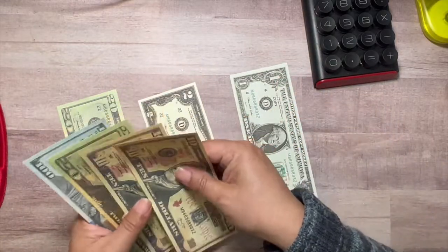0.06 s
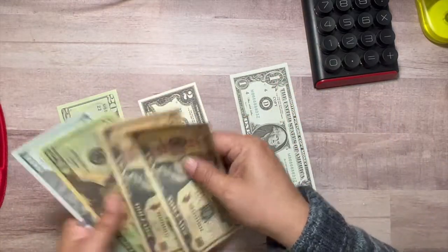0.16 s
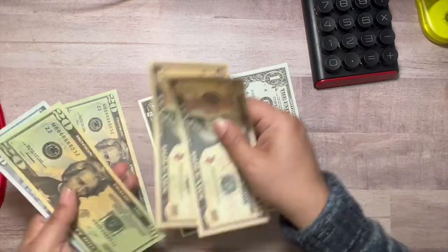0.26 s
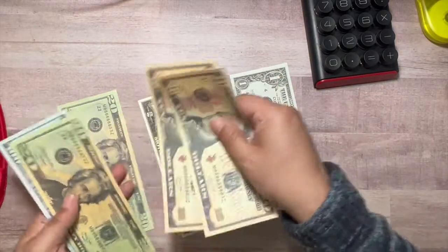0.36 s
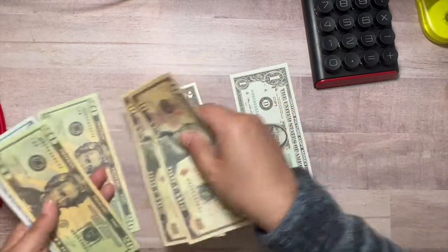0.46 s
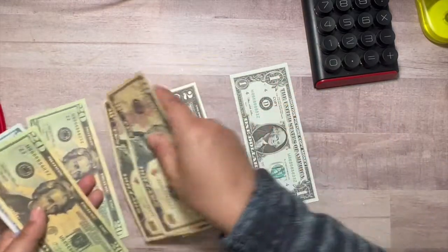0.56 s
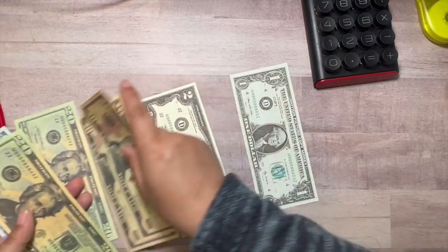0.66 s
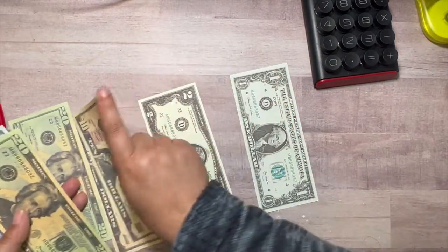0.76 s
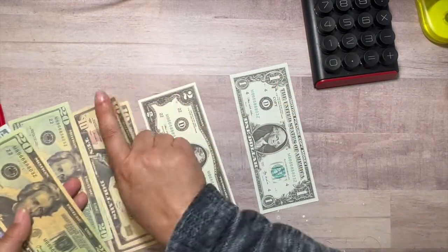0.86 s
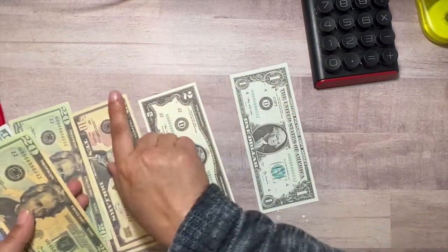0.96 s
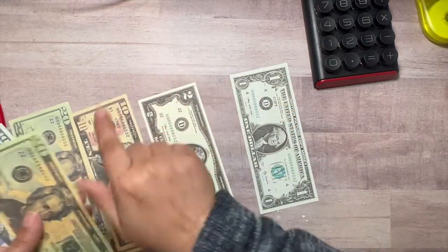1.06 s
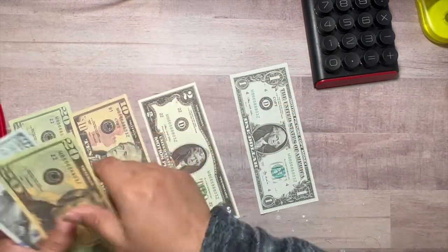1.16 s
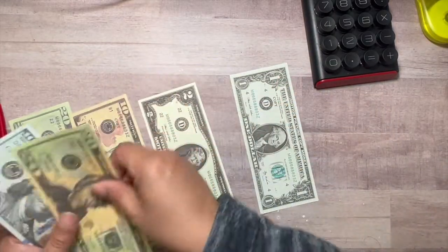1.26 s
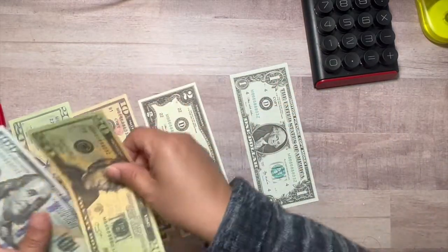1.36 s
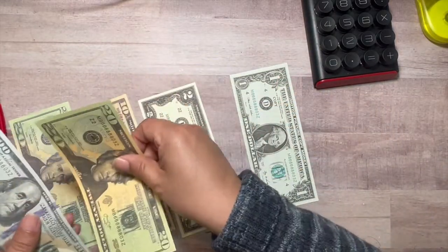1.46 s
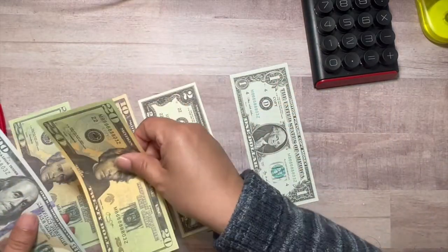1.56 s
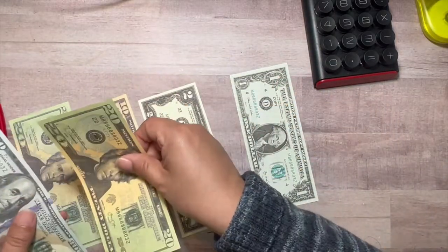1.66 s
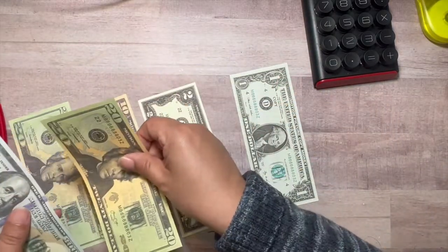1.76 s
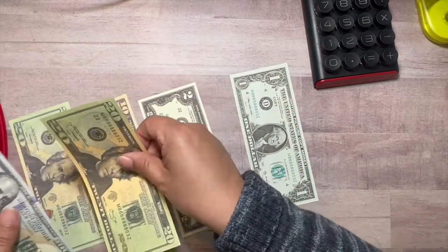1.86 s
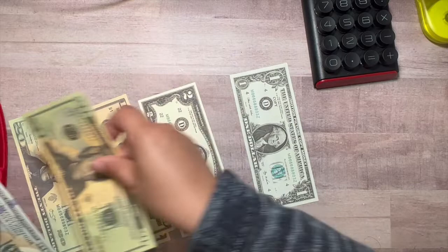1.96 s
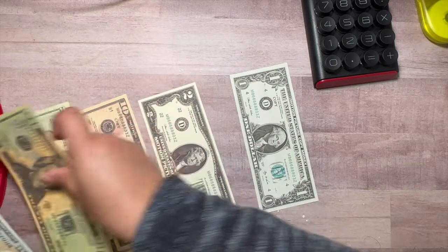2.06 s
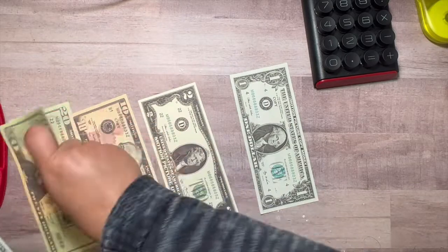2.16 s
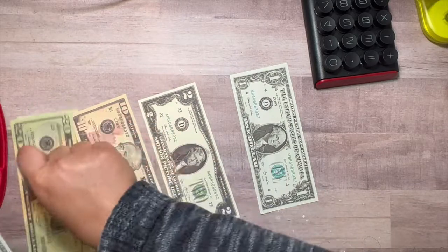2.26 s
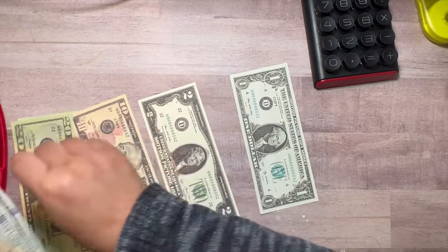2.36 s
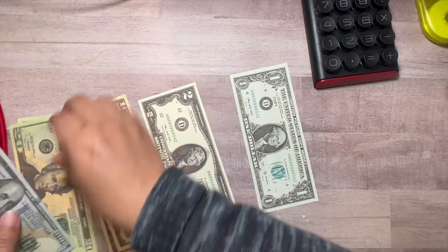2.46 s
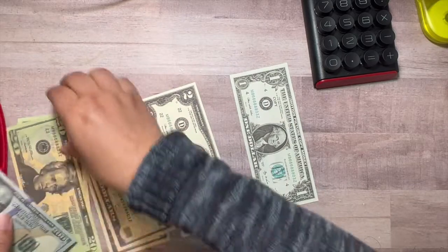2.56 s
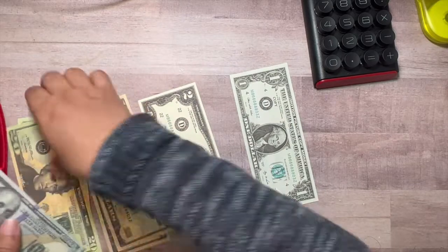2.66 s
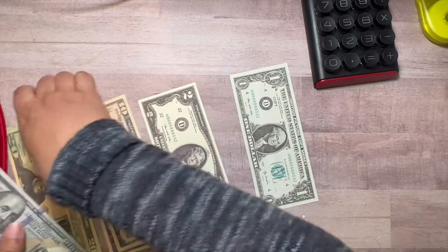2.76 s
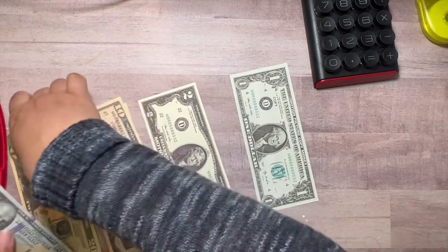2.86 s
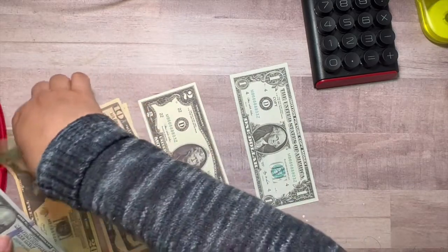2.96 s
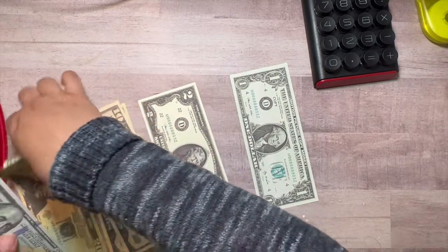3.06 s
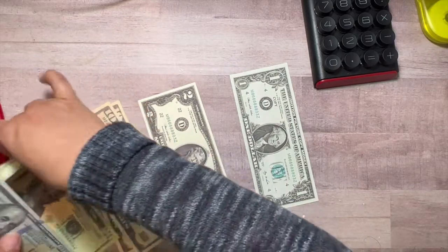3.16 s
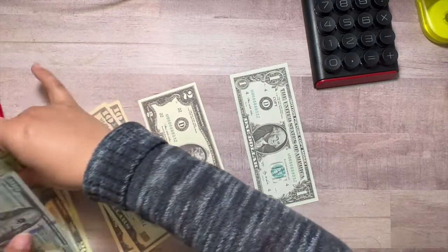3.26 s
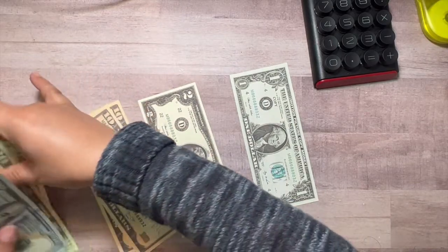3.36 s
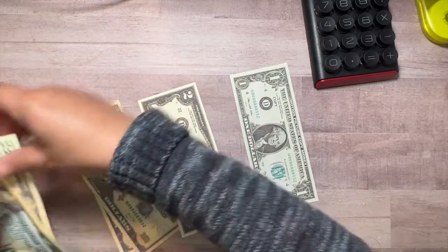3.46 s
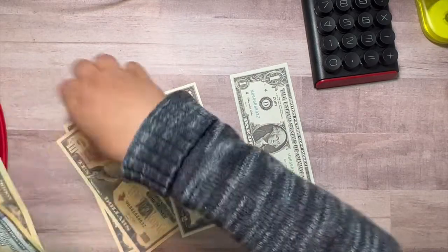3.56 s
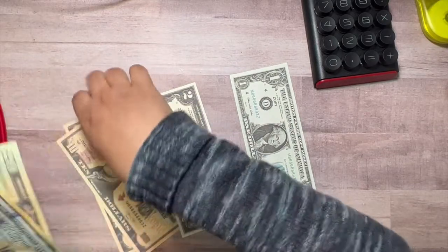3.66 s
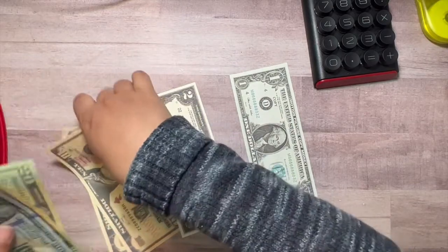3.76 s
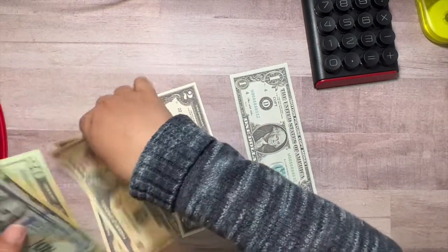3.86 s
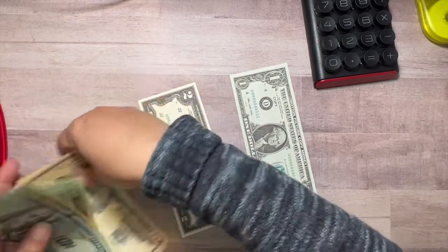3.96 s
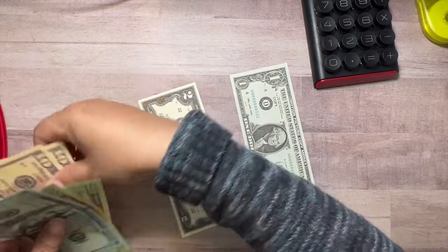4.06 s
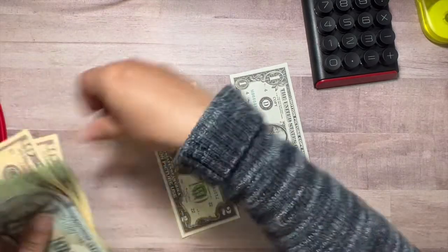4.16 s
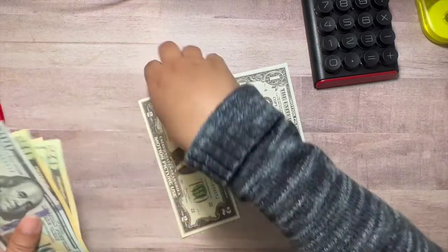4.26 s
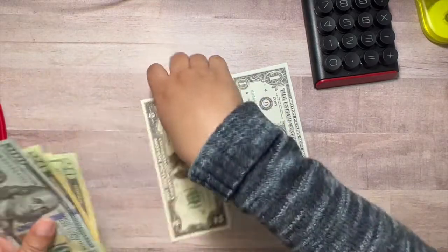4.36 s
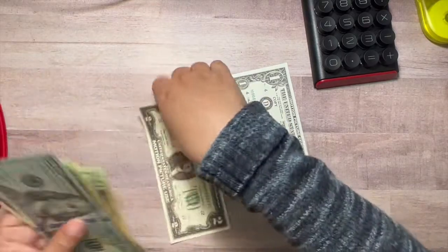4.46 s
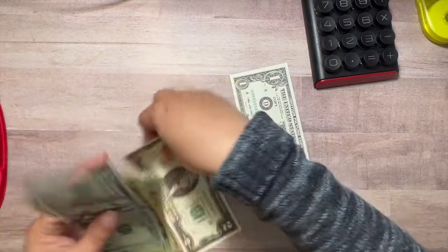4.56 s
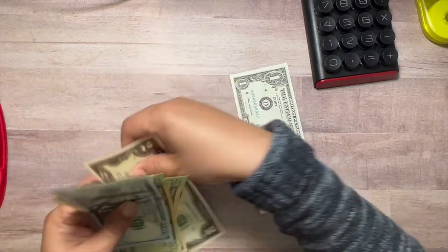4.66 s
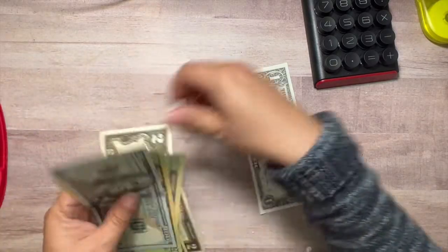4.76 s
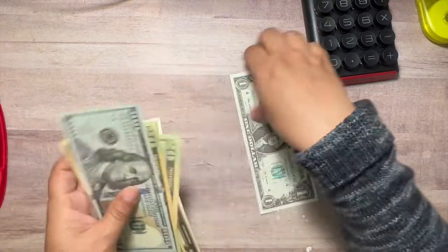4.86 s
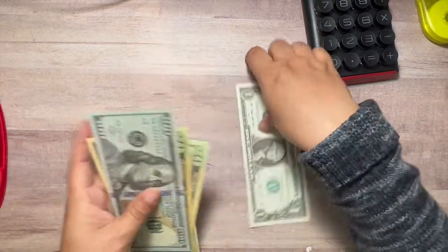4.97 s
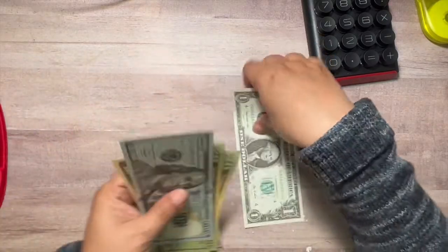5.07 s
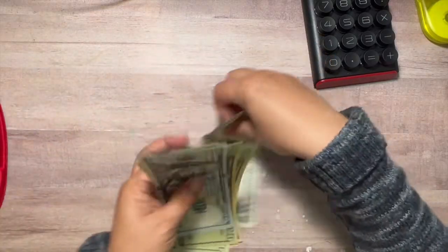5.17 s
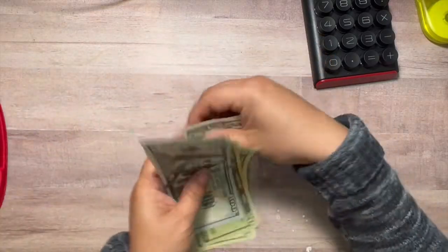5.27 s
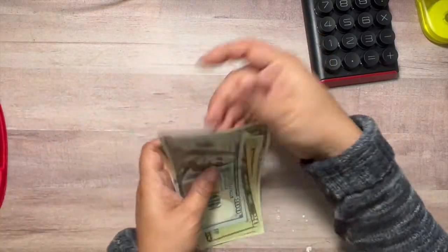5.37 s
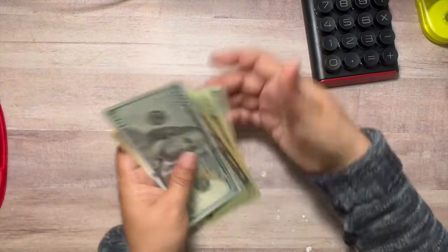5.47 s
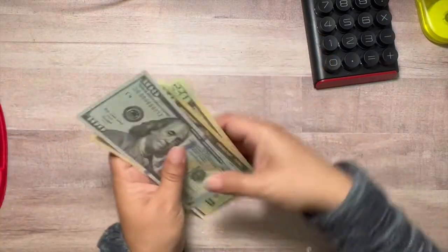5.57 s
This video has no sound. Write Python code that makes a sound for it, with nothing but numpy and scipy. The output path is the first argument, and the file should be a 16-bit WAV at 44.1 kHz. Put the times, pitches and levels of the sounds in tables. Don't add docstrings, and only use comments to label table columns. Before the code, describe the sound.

Close, dry paper handling: short crisp slides with tiny crackles and ticks, a clear crease snap near 1.2 seconds, then a quiet gap. Rustling returns after two seconds and crowds together after 3.5, with the hardest snaps at 4.4 and 5 seconds, then busy patting and gathering. Faint table thuds and wrist-drag hum; small still room, wide stereo.

```python
import sys
import numpy as np
from scipy import signal
from scipy.fft import rfft, irfft
from scipy.io import wavfile
from scipy.ndimage import uniform_filter1d

SR = 44100
rng = np.random.default_rng(int(sys.argv[2]) if len(sys.argv) > 2 else 0)


def undo_db(level):
    steps = np.asarray(level, float) / 20
    return 10 ** steps


def materialize(psi):
    bounded = np.clip(np.atleast_2d(psi).T, -1, 1)
    quanta = np.round(bounded * 32767).astype(np.int16)
    wavfile.write(sys.argv[1], SR, quanta)


N = 247401


def evened(x):
    return x / np.sqrt(np.mean(x ** 2) + 1e-20)


def read(points, hz):
    f, value = np.transpose(points)
    return np.interp(np.log(hz + 1), np.log(f + 1), value)


def add(mix, s, sound):
    part = mix[..., max(round(s * SR), 0):][..., :sound.shape[-1]]
    part += sound[..., :part.shape[-1]]


def band(x, lo_hz, hi_hz):
    sos = signal.butter(2, [lo_hz, min(hi_hz, SR / 2.1)], "bandpass", fs=SR, output="sos")
    return signal.sosfilt(sos, x)


def shaped(x, spectrum):
    return irfft(rfft(x) * undo_db(read(spectrum, np.fft.rfftfreq(N, 1 / SR))), N)


def lean():
    # t/s, rumble level/dB
    weight = [(0.0, -80), (0.23, -59), (0.449, -90), (0.75, -61.5), (0.95, -79), (1.1, -78), (1.22, -67),
              (1.4, -80), (1.81, -88), (2.15, -65), (2.45, -74), (2.86, -62.5), (3.09, -70), (3.35, -61),
              (3.55, -67), (4.05, -63), (4.3, -72), (4.94, -55.5), (5.61, -72)]
    s, db = np.transpose(weight)
    rumble = band(band(rng.standard_normal(N), 42, 156), 42, 156)
    rumble *= undo_db(4.2 * evened(uniform_filter1d(rng.standard_normal(N), size=3000)))
    return evened(rumble) * undo_db(np.interp(np.arange(N) / SR, s, db))


def air():
    # f/Hz, density/dB per Hz
    room_spectrum = [(20, -67), (40, -4.5), (63, -6.5), (120, -14), (700, -33), (1500, -31), (5000, -45),
                     (13000, -54)]
    level_db = -71
    return undo_db(level_db) * evened(shaped(rng.standard_normal((2, N)), room_spectrum))


def crackle():
    out = np.zeros((2, N))
    for hz in np.geomspace(500, 12000, num=10):
        clump = undo_db(5.3 * evened(uniform_filter1d(rng.standard_normal(N), 700)))
        size = undo_db(1.3 * np.minimum(rng.exponential(1, N), 4))
        struck = rng.random(N) < 350 / SR
        folds = clump * size * struck * rng.choice([-1, 1], (2, N))
        out += np.sqrt(hz) * evened(band(folds, hz / 1.4, hz * 1.25))
    return evened(out)


def patchy(x, patchy_db):
    z = signal.stft(x, nperseg=256)[2]
    field = uniform_filter1d(rng.standard_normal(z.shape[1:]), size=2, axis=0)
    field = uniform_filter1d(field, size=9, axis=1)
    return signal.istft(z * undo_db(patchy_db * evened(field)), nperseg=256)[1][:, :N]


def stroke_db(t, start, hold):
    attack_s, release_db_per_s = 0.024, 186
    rise = np.clip((t - start) / attack_s, 1e-5, 1)
    return 20 * np.log10(rise) - release_db_per_s * np.maximum(t - start - attack_s - hold, 0)


def slide():
    # f/Hz, density/dB per Hz
    paper_spectrum = [(150, 12), (300, -1), (800, -8), (1600, 15), (4100, 10), (7300, 17), (10000, 9),
                      (15700, -2)]
    # t/s, level/dB
    fidget = [(0, -59), (.4, -61), (.56, -58), (.96, -68), (1.4, -65), (1.5, -75.5), (1.67, -89.5),
              (1.8, -73.5), (1.92, -61.5), (2.3, -64.5), (2.53, -79), (2.75, -58), (3.02, -61), (3.5, -55),
              (4.29, -60.5), (4.9, -59.5), (5.52, -60.5), (5.61, -60)]
    # start/s, hold/s, rubbing level/dB, flapping body/dB re rubbing
    strokes = [(0.049, 0.1, -47, -4.5), (0.32, 0.052, -53, -6.5), (0.588, 0.093, -45, -13),
               (0.723, 0.056, -53.5, -5.5), (0.987, 0.044, -63.5, -8), (1.043, .11, -55.5, -10),
               (1.171, 0.086, -47, -10), (1.939, 0.15, -57.5, -2.5), (2.11, 0.026, -55.5, -7),
               (2.751, 0.012, -45.5, -3.5), (2.851, 0.051, -48.5, -10.5), (3.043, .11, -56.5, -30),
               (3.156, 0.073, -53.5, -22), (3.26, 0.086, -51.5, -2.5), (3.437, 0.09, -56.5, -1),
               (3.541, 0.016, -47, -5.5), (3.672, .07, -51.5, -7.5), (3.765, 0.12, -45.5, -6),
               (3.994, 0.13, -53.5, -8), (4.164, 0.037, -52.5, -19), (4.302, 0.2, -47.5, -9),
               (4.54, 0.13, -51.5, -4.5), (4.656, 0.027, -44.5, -4), (4.78, 0.027, -51, -6.5),
               (4.924, 0.16, -47, -9.5), (5.147, 0.058, -40.5, -7.5), (5.239, 0.038, -44.5, -3),
               (5.356, 0.076, -53.5, -10), (5.538, .06, -50.5, -2.5)]
    fidget_body_db, fidget_crisp_db = -6, -3
    crisp_db, crisp_per_db, hard_db = -1.5, 0.06, -45

    t = np.arange(0, N + 64, 64) / SR
    rubbing = undo_db(np.interp(t, *np.transpose(fidget))) ** 2
    body = rubbing * undo_db(fidget_body_db) ** 2
    bright = rubbing * undo_db(fidget_crisp_db) ** 2
    for start, hold, level_db, body_db in strokes:
        power = undo_db(level_db + stroke_db(t, start, hold)) ** 2
        rubbing = rubbing + power
        bright = bright + power
        body = body + power * undo_db(body_db) ** 2
    hardness_db = 10 * np.log10(rubbing) - hard_db
    crisp = bright * undo_db(crisp_db + crisp_per_db * hardness_db) ** 2
    rubbing, body, crisp = (np.interp(np.arange(N) / SR, t, np.sqrt(p)) for p in (rubbing, body, crisp))

    grip = undo_db(0.94 * evened(uniform_filter1d(rng.standard_normal(N), 500)))
    hiss = grip * rng.standard_normal((2, N))
    paper = patchy(shaped(hiss + 0.39 * crackle(), paper_spectrum), patchy_db=3)
    layers = rubbing * evened(band(paper, 1550, 6670))
    layers += body * evened(band(paper, 300, 1250))
    return layers + crisp * evened(band(paper, 9000, 18000))


def snaps():
    # t/s, peak/dB, ring f/Hz, crispness/dB re peak, buckling time/ms
    dry_creases = [(0.247, -38.5, 3330, -17, 3.3), (0.3416, -39.5, 1640, 11, 1.5),
                   (0.849, -38.5, 3360, -17.5, 3.4), (1.1129, -37, 1830, -17, 1.7),
                   (1.188, -19.5, 3730, -23, 1.3), (1.5271, -45.5, 6140, -16, 2),
                   (1.825, -45.5, 4470, -25, 1.9), (2.145, -25, 3740, -20.5, 1.96),
                   (2.393, -47, 1570, 0, 1), (2.606, -34, 5500, -11, 0.96), (3.2879, -37.5, 3880, -43, 1.9),
                   (3.671, -28, 5060, -24, 1.15), (3.7569, -13.5, 6650, -16.5, 1.8),
                   (2.9246, -21.5, 2730, -19.5, 1.2), (3.805, -20.5, 5100, -12.5, 1.4),
                   (4.0012, -22, 2950, -31, 0.74), (4.347, -30, 4800, -32, 1.9),
                   (4.357, -24, 4100, -29.5, 2.2), (4.3689, -11.5, 3760, -10.5, 1.4),
                   (4.3726, -7.5, 4890, -22, 3.6), (4.6381, -16.5, 4100, -25, 3.5),
                   (4.742, -29.5, 4570, -22.5, 3.6), (4.941, -32, 1520, 4, 1.4),
                   (4.9597, -6, 7500, -2, 1.2)]
    # t/s, peak/dB, ring f/Hz, crispness/dB re peak, buckling time/ms
    pops = [(0.6003, -39.5, 4480, -4, 1.5), (1.8, -56, 3630, -31, 0.97), (1.9532, -38.5, 4700, -16, 3.6),
            (1.9983, -34, 4700, -28, 2.2), (2.8723, -33, 2850, -24.5, 1.4),
            (3.0644, -43.5, 5630, -32, 0.82), (3.205, -28.5, 1860, -10.5, 2.6),
            (3.338, -36, 4600, -32.5, 1.5), (3.6978, -36.5, 2820, -27, 1.5),
            (2.9009, -26.5, 2380, -31.5, 0.78), (4.0467, -24.5, 1910, -29, 1.3),
            (4.2025, -32.5, 3760, -34, 1.1), (4.2234, -35, 4270, -18, 0.79), (4.32, -39, 8510, -6, 0.64),
            (5.2186, -21, 1820, -41, 1.5), (5.2697, -27.5, 2900, -23.5, 1.4)]
    # t/s, peak/dB, ring f/Hz, crispness/dB re peak
    peels = [(0.0703, -36, 2520, -7), (1.7376, -56, 4700, -35.5), (2.0204, -32, 4370, -13),
             (2.1013, -24.5, 2220, -30.5), (2.756, -25, 2430, -18), (3.3812, -37.5, 3580, -18),
             (3.462, -35.5, 5400, -12), (3.573, -37.5, 4700, -28), (3.9775, -24.5, 2500, -15),
             (4.5982, -28, 5480, -33), (4.8202, -34.5, 4100, -12.5), (4.9073, -36.5, 9200, 13),
             (5.165, -37, 8140, -18), (5.5587, -42.5, 8970, 0)]
    snap_flutter_db, pop_flutter_db, peel_flutter_db, peel_ms = -16.5, -4.5, 1, 1.4

    out, t = np.zeros((2, N)), np.arange(9000) / SR
    pause = 1 - np.exp(-(t / .006) ** 2)
    creases = [(*r, snap_flutter_db) for r in dry_creases]
    creases += [(*r, pop_flutter_db) for r in pops]
    creases += [(*r, peel_ms, peel_flutter_db) for r in peels]
    for s, peak_db, hz, crisp_db, buckle_ms, flutter_db in sorted(creases):
        noise = rng.standard_normal((4, 2, len(t)))
        age = 1000 * t / buckle_ms
        burst = age ** 1.24 * np.exp(1.43 * (1 - age))
        ragged_db = 2.9 * evened(uniform_filter1d(noise[3, 0], 90))
        flutter = undo_db(flutter_db + ragged_db - 60 * t / 0.095) * pause
        wide = band(noise[0], hz / 2.2, 12000)
        wide = evened(band(wide, hz / 2.2, min(hz * 2.5, 9000)))
        ring = evened(band(noise[1], hz / 1.232, hz * 1.158))
        crisp = undo_db(crisp_db + 7) * evened(band(noise[2], 8670, 13600))
        voice = 0.48 * wide + 0.47 * ring + crisp
        peak = abs(voice * burst).max(axis=1)[:, None]
        add(out, s - .0005, voice * (burst + flutter) * undo_db(peak_db) / peak)
    return out


def ticks():
    # t/s, peak/dB, ring f/Hz
    releases = [(0.0738, -37, 2620), (0.0871, -34, 1090), (0.2493, -35.5, 1120), (0.662, -34.5, 1760),
                (1.1308, -36, 1680), (1.1494, -41.5, 1210), (1.1618, -38.5, 1460), (1.1768, -38, 1340),
                (1.1889, -21.5, 5020), (1.529, -51, 6200), (1.7185, -66.5, 1080), (1.7401, -52.0, 4650),
                (1.7475, -53.0, 4650), (1.8002, -54.5, 4520), (1.8266, -44, 1110), (1.9525, -41, 5680),
                (1.9674, -35.5, 4690), (2.1028, -26, 2840), (2.147, -26, 2890), (2.3903, -53, 1160),
                (2.4022, -49, 1170), (2.5656, -61, 600), (2.6055, -41, 5840), (2.6933, -49.5, 910),
                (2.7254, -45, 1000), (2.7569, -22, 2250), (2.7932, -33.5, 3570), (2.7963, -33, 5600),
                (2.8678, -41, 3190), (2.8759, -37.5, 2430), (2.9012, -30.5, 2430), (3.0653, -41.5, 5700),
                (3.2078, -28, 6630), (3.3019, -37.5, 1005), (3.3368, -36.5, 1020), (3.3843, -37, 1070),
                (3.4981, -37, 1174), (3.5035, -39.0, 1120), (3.6709, -25.0, 4430), (3.7578, -17.5, 2870),
                (3.8064, -22.5, 5440), (3.9788, -24.0, 2410), (4.0015, -22, 1410), (4.0171, -31, 1030),
                (4.047, -26, 1350), (4.0832, -34.0, 1290), (4.2029, -36.5, 3000), (4.2621, -41.5, 3770),
                (4.3233, -35.0, 4500), (4.348, -30, 4910), (4.3682, -19.5, 3230), (4.3757, -13.5, 3750),
                (4.6416, -15.0, 4830), (4.9437, -33.0, 1720), (4.9603, -16, 11200), (5.2195, -26, 1690),
                (5.2706, -30.5, 2970), (5.2797, -23.0, 1480),
                (0.16, -40, 1130), (0.177, -40, 810), (0.251, -46, 3000), (0.34, -43, 1170),
                (2.766, -35, 2270), (2.918, -33, 2600), (3.076, -50, 5500), (3.217, -38, 6670),
                (3.282, -38, 2460), (3.29, -33, 4090), (3.308, -41, 4830), (3.344, -41, 2600),
                (3.464, -42, 5140), (3.765, -28, 6780), (3.894, -37, 3570), (3.9855, -31, 1020),
                (4.01, -30, 2800), (4.05, -32, 2000), (4.654, -32, 4770), (5.18, -40, 1290),
                (5.222, -28, 4160), (5.229, -29, 1810), (5.288, -31, 1700), (3.381, -36, 3700),
                (3.394, -42, 2800), (0.181, -42, 4800)]
    rise_cycles, edge_db = .8, -6
    out, t = np.zeros(N), np.arange(600) / SR
    for s, peak_db, hz in releases:
        u = t * hz / rise_cycles
        ring = np.sin(2 * np.pi * hz * t) * u * np.exp(1 - u)
        edge = rng.standard_normal(len(t)) * np.exp(-t / 0.0005)
        add(out, s - .0003, undo_db(peak_db - 1.5) * (ring + undo_db(edge_db) * edge))
    return out


def flaps():
    # t/s, peak/dB, ring f/Hz
    loose = [(0.0863, -35, 950), (0.161, -35, 962), (0.176, -46, 1080), (1.135, -44, 613),
             (1.165, -49, 440), (0.339, -39, 1034), (0.602, -53, 1160), (1.117, -37, 906),
             (1.955, -47, 1010), (2.03, -37.5, 1440), (2.104, -36.5, 1014), (2.142, -40, 395),
             (2.391, -44.5, 917), (2.918, -34.5, 700), (3.335, -36.5, 1100), (3.496, -38, 887),
             (3.982, -31, 1200), (4.016, -33, 1000), (4.046, -30, 1100), (4.203, -47, 397),
             (4.371, -29.5, 1117), (4.494, -43, 527), (4.602, -42, 426), (4.638, -24.5, 1437),
             (4.667, -45, 1460), (4.747, -33, 1320), (4.821, -45, 1250), (5.156, -43, 1360)]
    # t/s, peak/dB, ring f/Hz
    pats = [(0.248, -40, 930), (0.661, -39, 368), (1.188, -30.5, 883), (1.338, -49, 1050),
            (1.528, -57.5, 1000), (1.826, -50, 1044), (2.607, -44.5, 1075), (2.694, -48.5, 1100),
            (2.756, -33, 1064), (2.786, -42.5, 484), (3.209, -43, 455), (3.29, -37, 492),
            (3.384, -38, 1003), (3.461, -45, 440), (3.669, -40.5, 423), (3.757, -36.5, 466),
            (3.807, -39, 540), (4.225, -42, 373), (4.317, -42.5, 350), (4.348, -43, 423), (4.837, -36, 713),
            (4.906, -41.5, 440), (4.943, -36, 1650), (4.96, -28, 1470), (5.09, -44.5, 600),
            (5.179, -38.5, 462), (5.221, -27.5, 560), (5.279, -27.5, 1198), (5.571, -40.5, 430)]
    loose_t60_s, damped_t60_s = 0.14, 0.044
    out, t = np.zeros((2, N)), np.arange(5000) / SR
    for s, peak_db, hz, t60_s in sorted([(*r, loose_t60_s) for r in loose] + [(*r, damped_t60_s) for r in pats]):
        noise = rng.standard_normal((2, len(t)))
        lumps = undo_db(2.5 * evened(uniform_filter1d(noise[1, ::-1], size=130)))
        rattle = evened(lumps * band(noise, hz / 2.4, hz * 1.8))
        falling_hz = hz * (1 + 0.54 * np.exp(-t / 0.00079))
        ring = np.sin(2 * np.pi * np.cumsum(falling_hz) / SR) * undo_db(-60 * t / 0.041)
        pat = ring + 1.09 * rattle * undo_db(-60 * t / t60_s)
        pat = pat * (1 - np.exp(-t / 0.00048))
        add(out, s - .0005, pat * undo_db(peak_db) / abs(pat[0]).max())
    return out


def knocks():
    # t/s, peak/dB
    taps = [(0.173, -54), (0.294, -51), (0.36, -55), (0.664, -52), (0.794, -51), (2.142, -38), (2.398, -58),
            (2.606, -36), (2.693, -33), (2.924, -46.5), (3.346, -52), (3.572, -36.5), (3.635, -33),
            (3.979, -44), (4.225, -32), (4.314, -40.5), (4.366, -40), (4.839, -31), (5.163, -49)]
    # f/Hz, level/dB, t60/s
    modes = [(56.6, -1, 0.092), (120, -5, 0.16), (147, 4, 0.079), (164.3, -6, 0.21), (259.7, -11, 0.11),
             (375, -14.5, 0.17), (1000, -40, 0.017)]
    dimple_hz = 184.6
    out, t = np.zeros(N), np.arange(16000) / SR
    board = sum(undo_db(db - 60 * t / t60_s) * np.sin(2 * np.pi * hz * t) for hz, db, t60_s in modes)
    board = board * (1 - np.exp(-(t / 0.013) ** 2))
    sweep_hz = dimple_hz * (1 + 2.84 * np.exp(-t / 0.00396))
    blow = undo_db(-60 * t / 0.038) * np.sin(2 * np.pi * np.cumsum(sweep_hz) / SR)
    knock = blow * (1 - np.exp(-(t / 0.0052) ** 2)) + 0.44 * board
    for s, peak_db in taps:
        add(out, s - .001, undo_db(peak_db) * knock / abs(knock).max())
    return out


def swishes():
    # t/s, level/dB, f/Hz, length/s
    flicks = [(0.826, -55.5, 2700, 0.048), (1.96, -46.5, 6100, 0.016), (2.018, -39, 4300, 0.03),
              (2.102, -44, 2240, 0.062), (2.33, -60.5, 5500, 0.05), (0.765, -58, 4400, 0.06),
              (3.863, -44.5, 2860, 0.068), (3.94, -37, 13000, .045), (4.382, -40.5, 5400, 0.065),
              (3.94, -44.5, 4500, 0.042), (3.7565, -23.5, 2660, 0.0038), (0.297, -51, 12000, .008),
              (1.27, -51.5, 5700, 0.087), (3.276, -43.5, 3130, 0.028)]
    out = np.zeros((2, N))
    for s, level_db, hz, length_s in flicks:
        noise = rng.standard_normal((2, 4000))[:, :round(length_s * SR)]
        hollow = evened(band(noise, hz / 1.55, hz * 1.41))
        add(out, s, undo_db(level_db) * hollow * signal.windows.tukey(hollow.shape[1], .6))
    return out


def whistles():
    # t/s, level/dB, from f/Hz, to f/Hz, length/s
    gaps = [(.97, -66, 3200, 3700, .13), (2.25, -68, 4100, 5000, 0.06), (2.33, -56, 5100, 3600, 0.057),
            (3.33, -57, 5800, 3800, 0.11), (3.16, -54, 5500, 5600, .045), (3.865, -50, 4200, 3000, .05),
            (5.7, -47, 1700, 1800, 0.047), (2.43, -75, 7700, 7400, .06), (.85, -70, 900, 1100, .06),
            (2.47, -76, 700, 650, .12), (5.43, -63.5, 1200, 1000, .1)]
    relative_width, least_width_hz = .22, 600
    out = np.zeros((2, N))
    for s, level_db, from_hz, to_hz, length_s in gaps:
        noise = rng.standard_normal((2, 2, 7000))[..., :round(length_s * SR)]
        r = np.exp(-np.pi * max(relative_width * from_hz, least_width_hz) / SR)
        slow = signal.lfilter([1], np.convolve([1, -r], [1, -r]), noise[0] + 1j * noise[1])
        turn = 2 * np.pi * np.cumsum(np.linspace(from_hz, to_hz, slow.shape[1])) / SR
        tone = evened((slow * np.exp(1j * turn)).real)
        add(out, s, undo_db(level_db) * tone * signal.windows.tukey(slow.shape[1], .5))
    return out


def hum():
    # start/s, length/s, f/Hz, level/dB
    drags = [
        (1.35, 0.1, 147, -60),
        (2.08, 0.17, 140, -52.5),
        (2.7, 0.091, 146, -50),
        (4.55, 0.1, 145, -60.5),
        (4.88, 0.18, 158.4, -55),
        (5.29, 0.17, 146.6, -53.5),
    ]
    sag = 0.059
    out = np.zeros(N)
    for s, length_s, hz, level_db in drags:
        u = np.arange(0, length_s, 1 / SR) / length_s
        turn = 2 * np.pi * np.cumsum(hz * (1 + sag * (.5 - u))) / SR
        tone = np.cos(turn) + undo_db(-12) * np.cos(2 * turn)
        swell = np.sin(np.pi * u ** 0.75) ** 1.1
        add(out, s, np.sqrt(2) * undo_db(level_db) * tone * swell)
    return out


def echo(x):
    # f/Hz, t60/s
    decay = [(300, 0.16), (2000, 0.22), (8000, 0.17), (16000, 0.016)]
    taps = np.zeros((2, SR // 2))
    at = np.arange(350, SR // 2 - 20, 20)
    taps[[[0], [1]], at + rng.integers(0, 20, (2, len(at)))] = rng.choice([-1., 1.], (2, len(at)))
    hz, t, z = signal.stft(taps, SR, nperseg=256)
    tail = signal.istft(z * undo_db(-60 * t / read(decay, hz)[:, None]), SR, nperseg=256)[1]
    return signal.fftconvolve(x, tail / np.linalg.norm(tail[0]), axes=1)[:, :N]


def ports(shared, own, near):
    # f/Hz, likeness/1
    likeness = [(60, 0.91), (250, 0.8), (600, 0.36), (1800, 0.34), (4000, 0.068), (7200, 0.143),
                (8400, 0.46)]
    # f/Hz, left over right/dB
    shading = [(100, 1), (400, 0), (1100, 6.5), (2000, -0.5), (3000, 4.5), (4700, 8), (6300, 5.5),
               (7500, 2.5)]
    late_s, split_hz = 14 / SR, 8000
    even_hz, flip_hz, edge_hz = 8370, 1790, 15740
    hz = np.fft.rfftfreq(N, 1 / SR)
    steered = np.clip((hz - split_hz) / 800, 0, 1)
    turn = np.pi * (even_hz - hz) / flip_hz
    same = np.clip(read(likeness, hz), 0, 1)
    same = np.maximum(same, steered * (1 - .12 * np.sin(turn) ** 2))
    turn -= 2 / 3 * np.sin(2 * turn) - np.sin(4 * turn) / 12
    lag = np.exp(-1j * np.where(hz < split_hz, 2 * np.pi * hz * late_s, turn))
    far, close = rfft(shared), rfft(near)
    right = same * lag * far + np.sqrt(1 - same ** 2) * rfft(own) + lag * close
    shade = undo_db(.5 * read(shading, hz) * (1 - steered))
    low_cut = hz ** 3 / (hz ** 3 + 30.0 ** 3)
    top_db = -35 * np.clip((hz - edge_hz) / 100, 0, 1) - 60 * np.clip((hz - 16500) / 400, 0, 1)
    return irfft(np.array([(far + close) * shade, right / shade]) * low_cut * undo_db(top_db), N)


def scene():
    paper = slide() + snaps() + flaps() + swishes()
    heard = paper + air() + undo_db(-11.0) * echo(paper[[0, 0]]) + whistles()
    table = lean() + knocks() + hum()
    scattered_rumble = 0.94 * lean()
    return ports(heard[0] + table, heard[1] + scattered_rumble, ticks())


def top_cut(x):
    return signal.sosfilt(signal.butter(12, 17130, fs=SR, output="sos"), x)


def record(dry):
    return top_cut(dry)


dry = scene()
out = record(dry)
materialize(out)
```